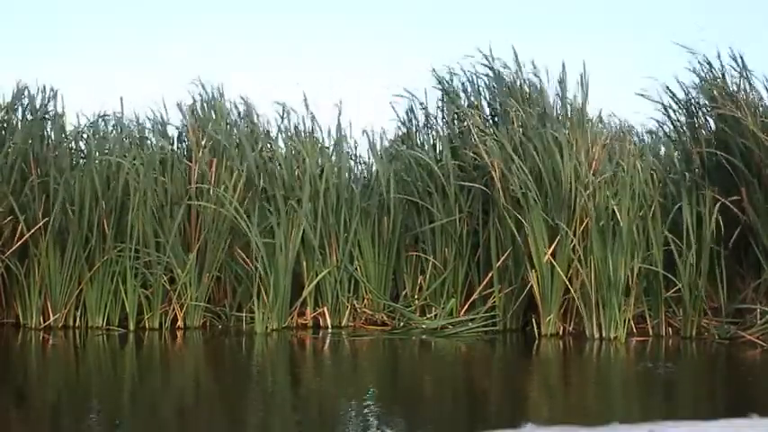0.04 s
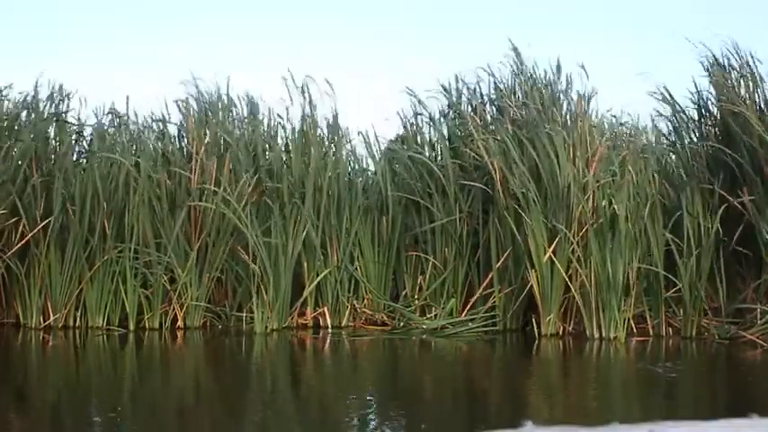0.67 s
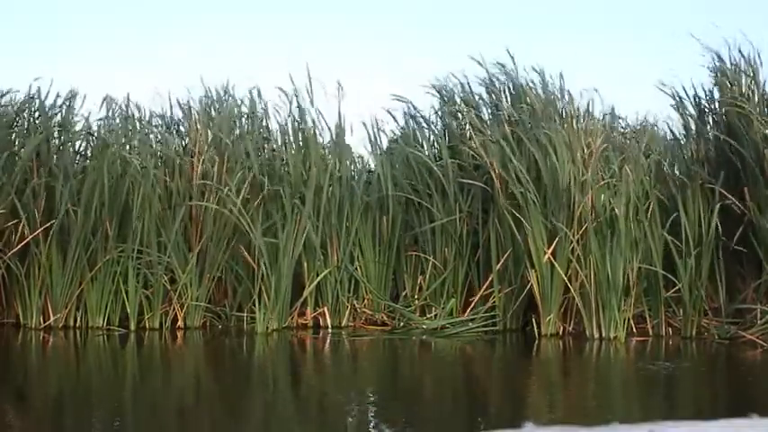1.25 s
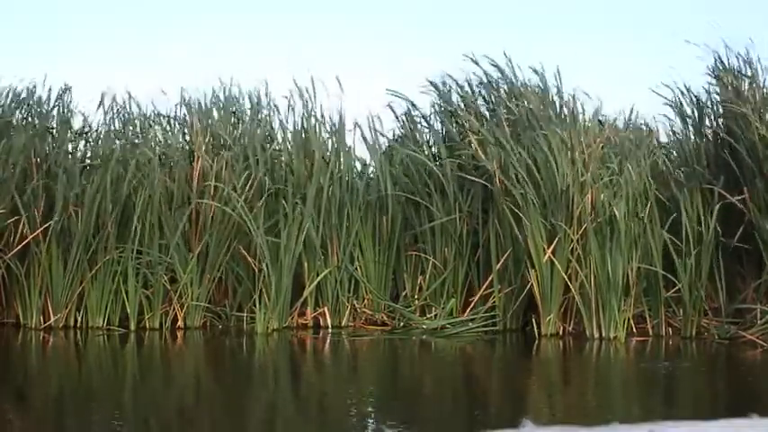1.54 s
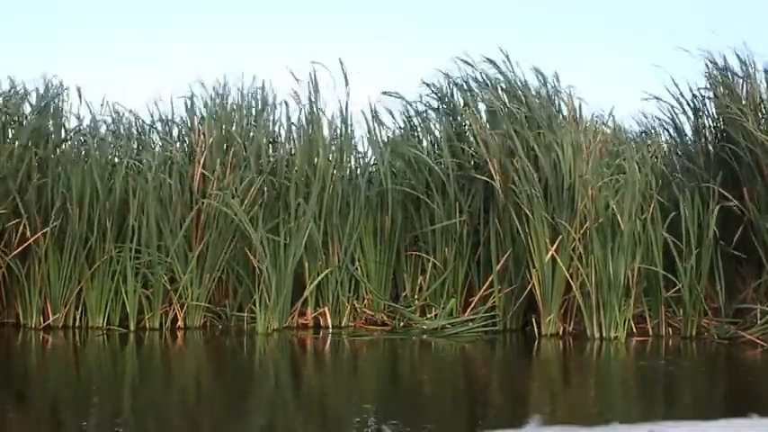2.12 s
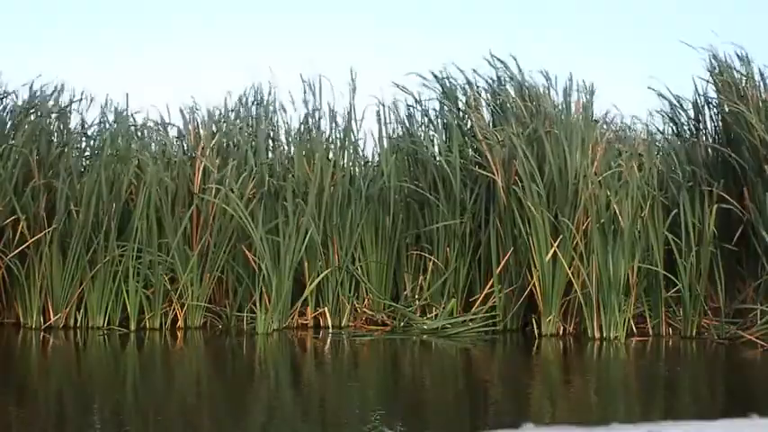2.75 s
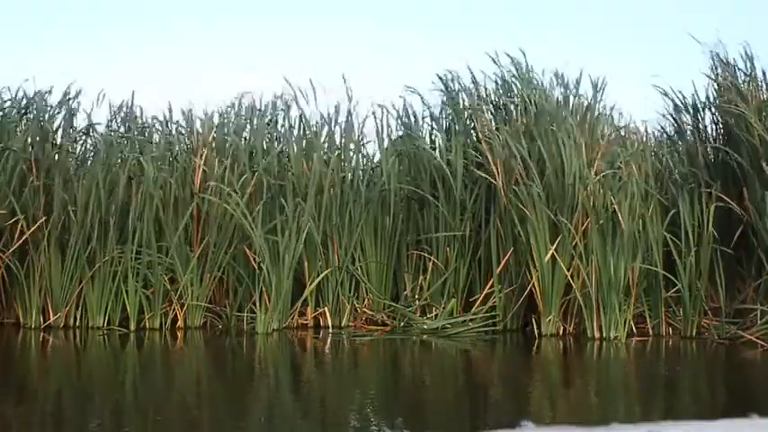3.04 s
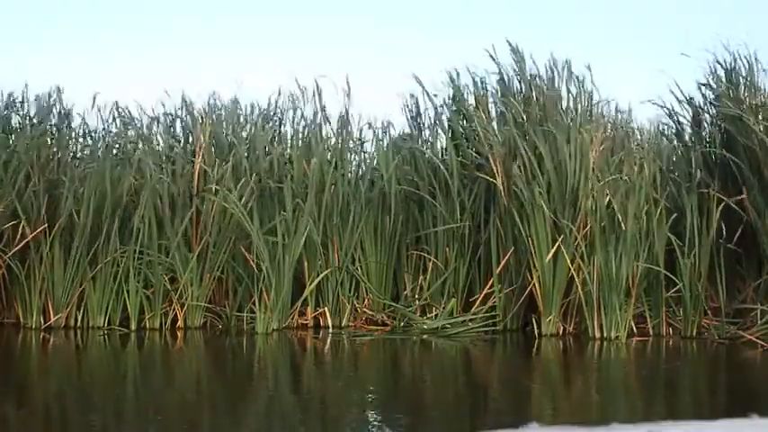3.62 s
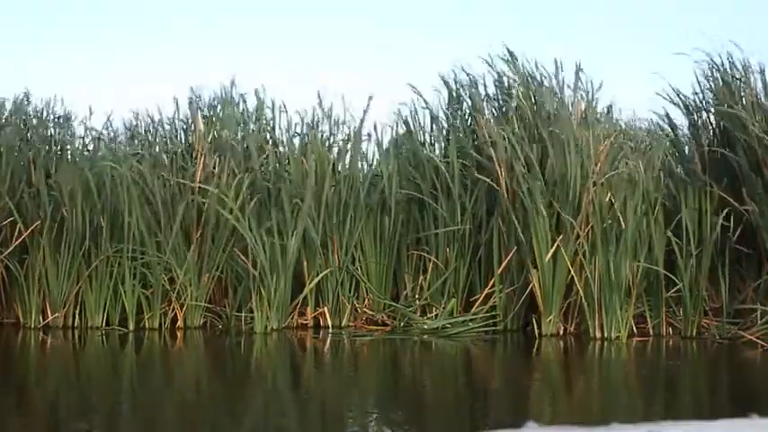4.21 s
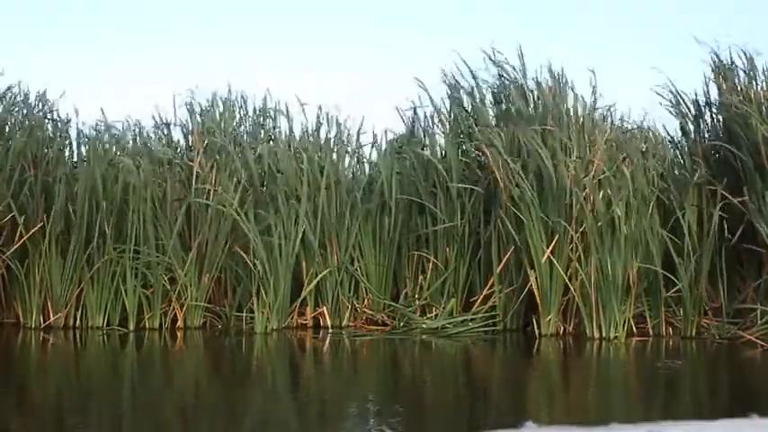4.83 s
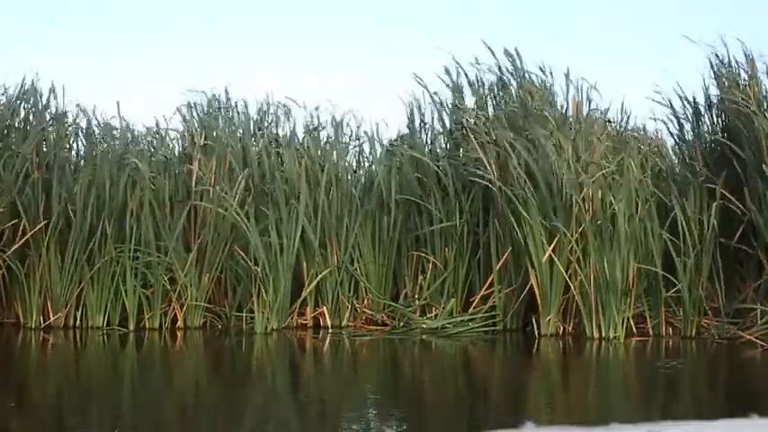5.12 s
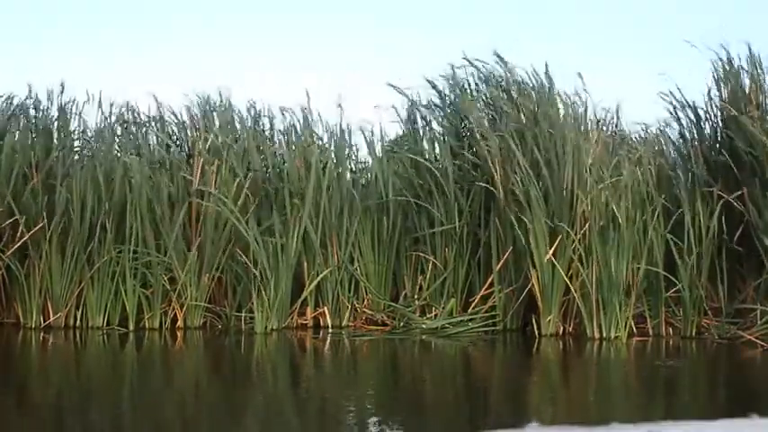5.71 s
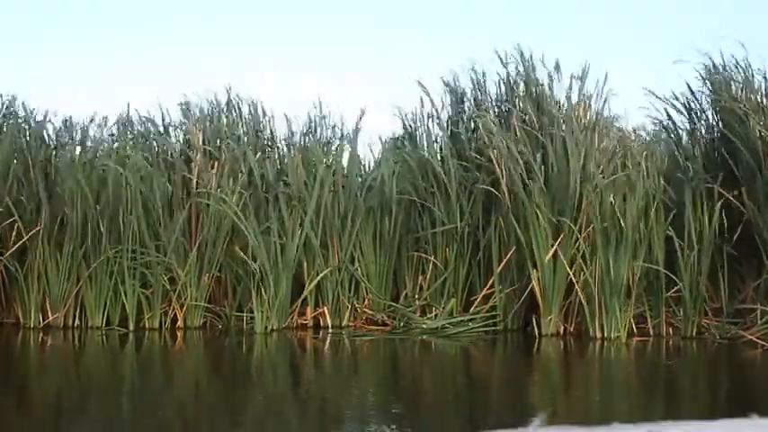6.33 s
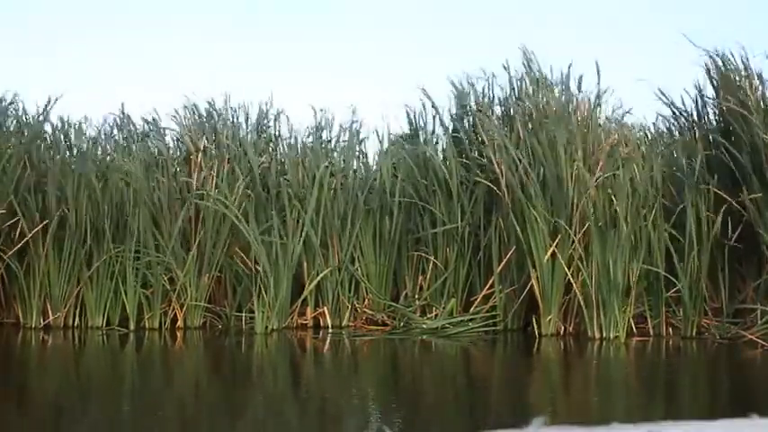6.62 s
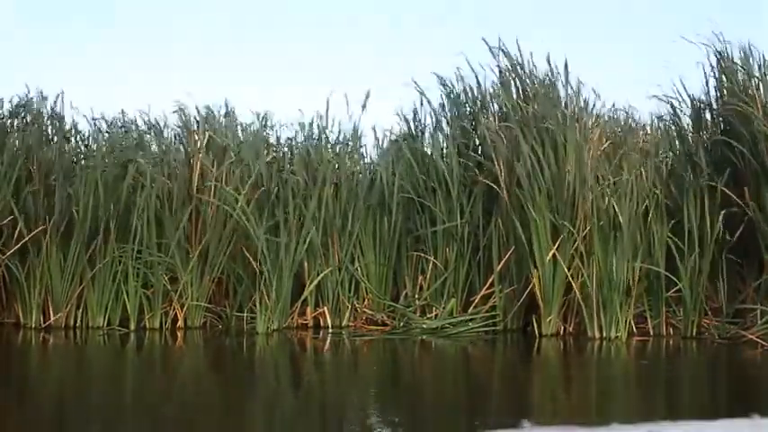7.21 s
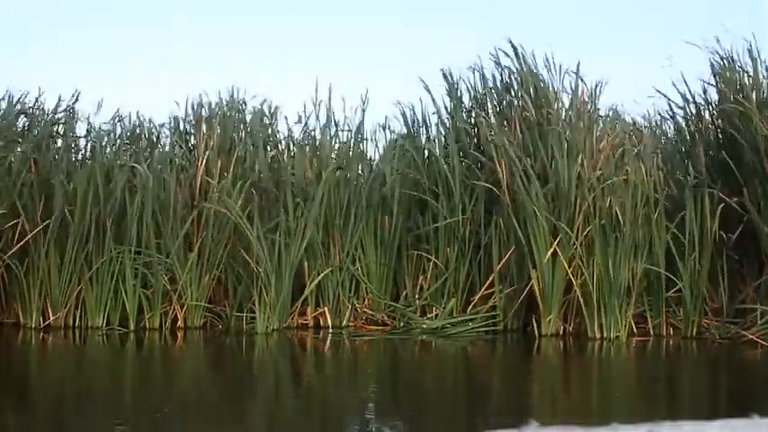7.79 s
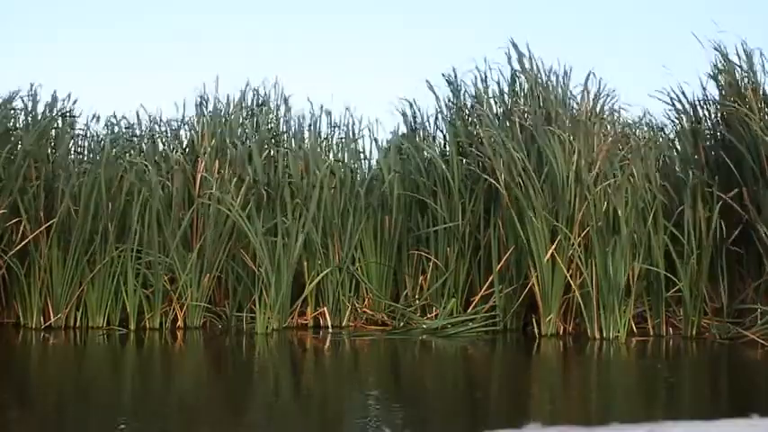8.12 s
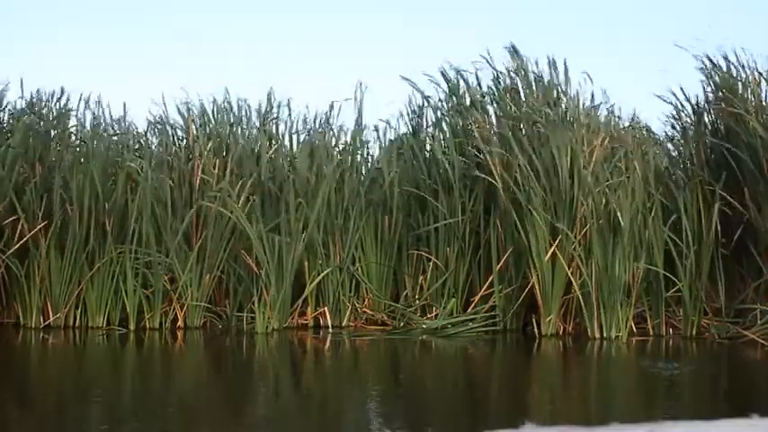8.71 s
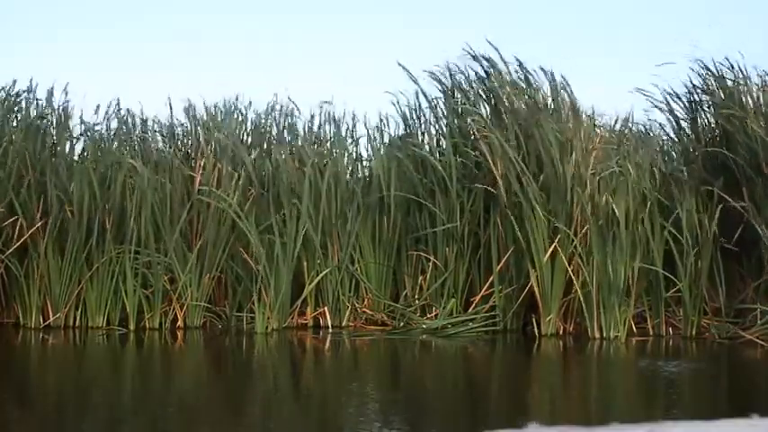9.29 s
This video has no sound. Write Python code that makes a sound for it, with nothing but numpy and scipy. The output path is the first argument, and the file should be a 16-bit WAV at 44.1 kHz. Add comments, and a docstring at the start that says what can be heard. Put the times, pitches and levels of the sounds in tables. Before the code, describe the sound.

A bed of reeds rustles in the breeze beside the water, with light wind bumps on the microphone. Faint, scattered chirps from small birds build to a brief trill, then the strongest gust hits the microphone with low rumbling thumps. As it drops away, several clearer chips ring out, and a farther bird whines nasally near the end over the softening hiss.

```python
"""Wind hisses through a tall reed bed at a lake shore: leaves rub and tick, air rushes between the stems.
One gust, strongest halfway, buffets the microphone; its eddies land as soft thuds over a rumble.
Small birds twitter and chip in short bent whistles. Farther off, another bird gives thin nasal whines,
stacks of harmonics shaped by its throat. The stems scatter the calls into an echo.
The mono recorder adds faint metallic tones to the whistles; its limiter ducks under the hardest thud."""
import sys
import numpy as np
from scipy import signal
from scipy.fft import rfft, irfft, next_fast_len
from scipy.io import wavfile
from scipy.ndimage import uniform_filter1d, map_coordinates

SR = 44100
rng = np.random.default_rng(int(sys.argv[2]) if len(sys.argv) > 2 else 0)


def dump(signal):
    """Clip the signal to [-1, 1] and save it as 16-bit WAV at the path in sys.argv[1]."""
    limited = np.clip(np.atleast_2d(signal).T, -1, 1)
    pcm = np.round(limited * 32767).astype(np.int16)
    wavfile.write(sys.argv[1], SR, pcm)


N = 412335


def amp(db):
    """Decibels to gain."""
    return 10 ** (np.asarray(db) / 20)


def unit(x):
    """x at rms 1."""
    return x / np.sqrt(np.mean(x ** 2) + 1e-20)


def spectrum_db(points, hz):
    """Rows of f/Hz, level/dB, read on a log frequency axis."""
    knots_hz, db = np.transpose(points)
    return np.interp(np.log(hz + 1), np.log(knots_hz + 1), db)


def envelope_db(points):
    """Rows of t/s, level/dB, read at every sample."""
    return np.interp(np.arange(N) / SR, *np.transpose(points))


def wobble(rate_hz):
    """Smooth random curve through rate_hz knots a second."""
    knots = rng.standard_normal(int(N * rate_hz / SR) + 4)
    return map_coordinates(knots, [np.arange(N) * rate_hz / SR])


def filtered(x, response):
    """Zero-phase filter; response maps Hz to gain."""
    size = next_fast_len(N + SR // 2)
    return irfft(rfft(x, size) * response(np.fft.rfftfreq(size, 1 / SR)), size)[:N]


def rush(spectrum, patchy_db):
    """Coloured noise at rms 1, with patches of random gain in time and frequency."""
    bins = signal.stft(rng.standard_normal(N), nperseg=512)[2]
    patches = uniform_filter1d(rng.standard_normal(bins.shape), size=8, axis=0)
    patches = unit(uniform_filter1d(patches, size=16, axis=1))
    noise = signal.istft(bins * amp(patchy_db * patches), nperseg=512)[1][:N]
    return unit(filtered(noise, lambda hz: amp(spectrum_db(spectrum, hz))))


def fade(t, length_s, edge_s):
    """Quarter-sine fade in and out."""
    return np.sin(np.pi / 2 * np.clip(np.minimum(t, length_s - t) / edge_s, 0, 1))


def add(track, start_s, sound):
    """Mix a short sound into the track."""
    part = track[max(round(start_s * SR), 0):][:len(sound)]
    part += sound[:len(part)]


def leaf_ticks(count=9000, spread_db=4.0, decay_cycles=4):
    """Dry blades tap each other: tiny damped pings of scattered pitch and size."""
    when, pitch, size = rng.random((count, 3)).T[:, :, None]
    hz = 2500 * (13000 / 2500) ** pitch
    gain = amp(-spread_db * np.log(np.maximum(size, np.exp(-5))))
    offsets = np.arange(96)
    cycles = hz * offsets / SR
    pings = gain * np.sin(2 * np.pi * cycles) * np.exp(-cycles / decay_cycles)
    samples = (when * N).astype(int) + offsets
    return unit(np.bincount(samples.ravel(), pings.ravel(), N)[:N])


def reeds():
    """Leaves rub into a hiss that brightens with the wind; the nearest tick; air rushes past stems."""
    # wind in the leaves: t/s, relative level/dB
    breeze = [(0, -44.5), (.7, -44), (1.5, -42), (3.2, -41.5), (3.7, -42), (4.4, -42), (5.2, -44),
              (7, -45.5), (7.5, -46.5), (9.35, -47.5)]
    # spectra of leaf hiss, finest hiss and stem rush: f/Hz, relative level/dB
    leaf_spectrum = [(600, -33), (1500, -4.5), (2800, -2), (4000, -1.5), (5200, -1.5), (7500, -4.5),
                     (9500, -4.5), (11500, -4.5), (13500, -10.5), (16000, -20)]
    fizz_spectrum = [(4000, -24), (8000, -12), (11500, -1.5), (14000, -1), (16000, -5.5)]
    stem_spectrum = [(60, -20), (150, 7.5), (300, 4.5), (600, 1), (1000, -1.5), (1600, -5), (3000, -13.5),
                     (8000, -36)]
    leaf_db = envelope_db(breeze)
    gust_db = leaf_db - leaf_db.mean()
    sway_db = wobble(3.01)
    stir_db = 0.26 * sway_db + 0.5 * wobble(14)
    hiss = amp(leaf_db + 5.5 + stir_db) * rush(leaf_spectrum, patchy_db=0.3)
    fizz = amp(-47 + 1.35 * (gust_db + stir_db) + 0.43 * wobble(40)) * rush(fizz_spectrum, patchy_db=2.5)
    ticks = amp(leaf_db - 9.5 + sway_db + 4.6 * wobble(20)) * leaf_ticks()
    stems = amp(-40 + 0.86 * gust_db + 0.56 * wobble(4.6)) * rush(stem_spectrum, patchy_db=1.4)
    return hiss + fizz + ticks + stems


def among_stems(calls, wet_db, near_t60_s, far_db, far_t60_s=0.99):
    """Stems scatter a call into a dense echo; the shore adds a faint longer one."""
    t = np.arange(SR // 2) / SR
    decay = amp(-60 * t / near_t60_s) + amp(far_db - 60 * t / far_t60_s)
    tail = rng.standard_normal(len(t)) * decay * (t > 0.004)
    return calls + amp(wet_db) * signal.fftconvolve(calls, tail / np.linalg.norm(tail))[:N]


def whining_bird(fading_db=2.5, rough_depth=0.038):
    """Reedy harmonics bend through three pitches; each wavers in level on its way through the stems."""
    # syllables: t/s, length/s, first f/Hz, middle f/Hz, last f/Hz, level/dB,
    # tilt/(dB/octave), even-harmonic gain/dB, roughness/0-1
    syllables = [(-.01, 0.06, 667, 750, 715, -39, -4, 2, 0), (.036, .07, 700, 652, 770, -38.5, -4, 4, 0),
                 (0.105, 0.039, 675, 650, 665, -37, 0, 1, 0.04),
                 (.155, .04, 694, 745, 715, -44.5, -7, 10, .2), (3.99, 0.062, 746, 745, 756, -40, 1, 0, .7),
                 (4.053, 0.08, 765, 762, 768, -36.5, 5.5, 2.5, 0.44),
                 (4.15, .062, 762, 730, 756, -39, 4, -1, .9), (4.219, 0.045, 740, 752, 770, -37, 9, 0, .8),
                 (6.45, .27, 703, 693, 713, -47, 6, -1, 0.85),
                 (8.456, 0.049, 712, 783, 815, -45, -1, -2, .3),
                 (8.491, .082, 753, 767, 865, -40, 0, -1, 0.5),
                 (8.561, .082, 790, 740, 820, -37.5, 2, -2, 0.44),
                 (8.641, 0.047, 708, 730, 820, -35.5, 6, -6, 0.1),
                 (8.68, .048, 796, 847, 816, -36.5, 3.5, 1, 0.3),
                 (9.091, 0.034, 716, 715, 750, -41, -1, 1, .4),
                 (9.118, .105, 746, 729, 697, -37, 0, 4, 0.26),
                 (9.221, 0.096, 700, 691, 668, -36.5, 1, 7, 0.55)]
    # throat response: f/Hz, gain/dB
    throat = [(1330, -8), (1420, -8.5), (1500, -4.5), (1620, -5), (1750, -4), (1960, 6.5), (2170, 5),
              (2400, 2.5), (2600, -9), (2740, 0.5), (2900, -3.5), (3100, -18), (3400, -4), (3600, -8),
              (4000, -6), (4500, -8), (4750, -14), (5030, -6.5), (5220, -15), (5500, -11), (6000, -20),
              (6550, -11), (7200, -24)]
    calls = np.zeros(N)
    orders = np.arange(2, 9)[:, None]
    jitter = wobble(350)
    fades_db = fading_db * np.array([wobble(45) for _ in orders])
    for start_s, length_s, first_hz, middle_hz, last_hz, db, tilt_db, even_db, rough in syllables:
        t = np.arange(N) / SR - start_s
        on = (t >= 0) & (t <= length_s)
        t = t[on]
        hz = np.polyval(np.polyfit([0, 0.5, 1], [first_hz, middle_hz, last_hz], 2), t / length_s)
        phase = 2 * np.pi * np.cumsum(hz * (1 + rough_depth * rough * jitter[on])) / SR
        voice_db = tilt_db * np.log2(orders) + even_db * (orders % 2 == 0)
        gains = amp(voice_db + spectrum_db(throat, orders * hz) + fades_db[:, on])
        tone = unit((gains * np.sin(orders * phase)).sum(axis=0))
        add(calls, start_s, amp(db) * fade(t, length_s, edge_s=0.011) * tone)
    return calls


def twitter_notes(arch=0.0135):
    """Single gliding notes, bent up slightly in the middle."""
    # notes: t/s, length/s, f/Hz, glide/octaves, level/dB, rasp/0-1
    notes = [(0.98, 0.023, 2690, 0, -44, 0.15), (1.223, 0.028, 2640, 0.08, -42, 0.25),
             (1.475, .03, 3050, 0.02, -44, 0), (1.607, .04, 2950, 0, -43, 0.16),
             (1.682, 0.032, 2820, -0.023, -40, 0.04), (1.717, .035, 3050, -0.086, -39.5, 0.4),
             (1.841, 0.042, 3050, .08, -42, .3), (2.048, 0.06, 3290, -0.016, -47, 0.1),
             (2.274, 0.054, 3150, 0.11, -44, 0.1), (3.311, .06, 3080, -0.023, -42.5, 0.27),
             (3.455, 0.055, 2940, 0.015, -41, 0.25), (3.594, 0.082, 2456, -0.44, -41, 0.8),
             (3.786, 0.04, 2670, -0.17, -34, 0.12), (3.918, 0.072, 2620, -0.092, -33.5, 0.6),
             (4.242, .025, 2690, -0.065, -35.5, .2), (4.26, 0.027, 2160, 0.045, -33, 0.24),
             (4.292, 0.1, 1850, 0.04, -35.5, 0.41), (4.386, 0.063, 1745, -0.065, -37.5, 0),
             (4.522, 0.053, 2560, 0.029, -41, 0.24), (4.755, 0.025, 3380, 0.073, -30, .35),
             (4.982, 0.037, 2190, 0.015, -37.5, 0), (5.109, 0.025, 2590, 0.017, -37, 0.16),
             (5.941, 0.0425, 2600, 0.16, -27.5, 1), (6.374, 0.035, 2760, -0.015, -28.5, 0.6),
             (6.418, 0.4, 2542, -0.084, -44, 0.31), (7.255, 0.041, 2500, 0, -40, 0.34),
             (7.352, 0.02, 2315, -0.4, -30, 0.57), (7.372, 0.049, 2301, 0.032, -24, 0.16),
             (7.44, 0.009, 3320, -.3, -22.5, 0.24), (7.446, 0.015, 2930, -0.086, -16.5, 0.4),
             (8.748, 0.023, 2380, 0.028, -41, 0.5), (8.861, 0.021, 2480, -0.15, -36.5, 0.57),
             (8.969, 0.029, 2370, 0.15, -38.5, 0.7)]
    return [(start_s, db, length_s, hz * 2 ** (-glide / 2), hz * (1 + arch), hz * 2 ** (glide / 2), rasp)
            for start_s, length_s, hz, glide, db, rasp in notes]


def trill_notes(foot_s=0.016, foot_db=-33.5, foot_rasp=0.24, top_s=0.042, top_rasp=0.25, bend=0.025):
    """Upward hooks: each touches the same soft foot, then leaps to a raspy arch."""
    # hook tops: t/s, f/Hz, level/dB
    hooks = [(4.556, 3590, -30), (4.636, 3590, -29.5), (4.721, 3770, -29.5), (4.808, 3650, -31),
             (4.885, 3580, -33)]
    foot_hz = (3100, 2900, 3190)
    feet = [(start_s, foot_db, foot_s, *foot_hz, foot_rasp) for start_s, _, _ in hooks]
    tops = [(start_s + foot_s, db, top_s, hz * (1 - bend), hz, hz * (1 - bend / 2), top_rasp)
            for start_s, hz, db in hooks]
    return feet + tops


def chip_notes():
    """Two-part chips: a raspy arch leaps straight to a clear whistle."""
    # chips: t/s, arch level/dB, whistle level/dB
    chips = [(6.701, -24, -24), (6.96, -25, -23)]
    # the two parts: length/s, first f/Hz, middle f/Hz, last f/Hz, rasp/0-1
    arch = (0.042, 3080, 3680, 3350, 0.29)
    whistle = (0.046, 4740, 4900, 4850, 0.079)
    notes = []
    for start_s, arch_db, whistle_db in chips:
        notes += [(start_s, arch_db, *arch), (start_s + arch[0], whistle_db, *whistle)]
    return notes


def recorder_distortion(whistle, t, level_db=-22, offset_hz=3900):
    """The recorder's distortion adds faint metallic side tones 3.9 kHz either side of each whistle."""
    return 2 * amp(level_db) * whistle * np.cos(2 * np.pi * offset_hz * t)


def songbirds(rasp_depth=0.16, third_db=-23):
    """Whistles bend through three pitches; fast pitch jitter adds rasp."""
    song, jitter = np.zeros(N), wobble(900)
    for start_s, db, length_s, *bend_hz, rasp in twitter_notes() + trill_notes() + chip_notes():
        t = np.arange(int(length_s * SR)) / SR
        hz = np.interp(t, [0, 0.397 * length_s, length_s], bend_hz)
        hz *= 1 + rasp_depth * rasp * jitter[round(start_s * SR):][:len(t)]
        phase = 2 * np.pi * np.cumsum(hz) / SR
        whistle = np.sin(phase)
        tone = whistle + amp(third_db) * np.sin(3 * phase) + recorder_distortion(whistle, t)
        add(song, start_s, amp(db + 0.05) * fade(t, length_s, edge_s=0.0046) * tone)
    return song


def eddy_arrivals(rumble_db, places, crowding):
    """Sample indices crowded into strong flow: one per equal share of it, at a place 0-1 within."""
    flow = np.cumsum(amp(crowding * rumble_db))
    return np.searchsorted(flow, flow[-1] * (np.arange(len(places)) + places) / len(places))


def small_eddies(rumble_db, count=34, scatter_db=3, typical_hz=118, scatter_octaves=0.42):
    """Lesser eddies, one cycle wide, arrive by chance, more often and harder in strong flow."""
    at = eddy_arrivals(rumble_db, rng.random(count), crowding=0.67)
    size, pitch = rng.standard_normal((count, 2)).T
    db = rumble_db[at] + 6 + scatter_db * size
    hz = typical_hz * 2 ** (scatter_octaves * pitch)
    return list(zip(at / SR, db, hz, np.ones(count)))


def flutter(rumble_db, count=150, centre_hz=210, width_cycles=0.55, loss_db_per_octave=8):
    """Small quick eddies crowd into the strongest flow, each a brief swing of its own pitch and size."""
    places, sizes, pitches, turns = rng.random((count, 4)).T
    arrivals = eddy_arrivals(rumble_db, places, crowding=1.3)
    t = np.arange(-SR // 40, SR // 40) / SR
    track = np.zeros(N)
    for at, size, octaves, turn in zip(arrivals, sizes, 2.6 * (pitches - 0.5), turns):
        hz = centre_hz * 2 ** octaves
        db = rumble_db[at] + 8 * (size - 0.5) - loss_db_per_octave * octaves
        swell = np.exp(-0.5 * (t * hz / width_cycles) ** 2)
        add(track, at / SR + t[0], amp(db) * swell * np.sin(2 * np.pi * (hz * t + turn)))
    return track


def buffeting(wake_s=0.04):
    """Turbulence rumbles on the microphone; eddies are pressure swings with ragged crests and wakes."""
    # wind on the microphone: t/s, relative level/dB
    gust = [(0, -48), (.31, -45), (1.05, -54), (2.05, -47), (2.47, -36), (3.1, -44.5), (3.49, -37),
            (4.2, -44), (4.85, -36.5), (5.1, -31.5), (5.55, -27), (5.95, -32), (6.25, -35.5), (6.48, -34.5),
            (6.7, -43), (7.55, -41.5), (8.18, -37), (8.65, -48.5), (9.35, -37)]
    # strongest eddies: t/s, relative level/dB, f/Hz, Gaussian width/cycles
    strong_eddies = [(.124, -16.5, 260, 0.51), (.228, -21.5, 194, 0.48), (.268, -21, 137, 0.51),
                     (.37, -29, 327, 1.4), (.429, -12.5, 161, 0.64), (.465, -21, 170, 0.54),
                     (.652, -17.5, 146, 0.74), (1.334, -17.5, 133, 0.46), (2.37, -13, 105, 0.81),
                     (2.491, -23, 150, 0.77), (2.618, -27, 135, 0.64), (2.654, -18.5, 98, 0.84),
                     (3.43, -17, 231, 1.24), (3.454, -19, 113, 0.99), (3.494, -29, 140, 0.5),
                     (3.826, -19, 117, .6), (3.875, -14.5, 166, 0.85), (4.068, -23, 130, 0.58),
                     (4.393, -21, 159, 0.52), (4.423, -22, 162, 0.63), (4.819, -20, 128, 0.59),
                     (4.899, -23, 130, 0.48), (4.996, -11.5, 109, 0.74), (5.088, -11.5, 128, 0.76),
                     (5.125, -4.5, 138, 0.61), (5.131, -16.5, 420, 0.66), (5.179, -5, 160, 0.56),
                     (5.203, -20, 170, .7), (5.223, -13, 122, 0.85), (5.396, -12, 128, 0.9),
                     (5.449, -8.5, 302, 0.83), (5.457, 4, 152, 1.04), (5.478, -10, 340, 0.65),
                     (5.533, -6, 150, 1.3), (5.559, -8, 187, 1.4), (5.581, -1, 291, 0.77),
                     (5.63, -20.5, 260, .8), (5.662, -15, 300, 0.7), (5.72, -8.5, 141, 1.3),
                     (5.768, -13, 203, 1.4), (5.852, -8.5, 165, 0.64), (5.912, -14.5, 131, 0.54),
                     (5.958, -16.5, 260, 0.86), (6.015, -12, 130, 0.7), (6.085, -19.5, 500, 0.83),
                     (6.108, -6, 118, 0.48), (6.151, -15, 198, .9), (6.433, -18.5, 335, 0.9),
                     (6.461, -18, 147, 0.79), (6.49, -17, 234, 0.59), (6.51, -15, 161, 0.67),
                     (6.558, -10.5, 192, 0.64), (6.739, -19, 173, 0.4), (7.09, -21, 127, 0.89),
                     (7.378, -18, 118, .7), (7.408, -22.5, 235, 0.96), (7.426, -20.5, 147, 0.66),
                     (7.587, -19, 130, 0.84), (7.779, -19.5, 160, 0.69), (8.105, -18.5, 187, 1.1),
                     (8.152, -19, 145, 0.8), (8.175, -22, 165, 0.82), (8.22, -22.5, 170, 0.53),
                     (9.058, -15.5, 130, 0.47)]
    # spectra of rumble and eddy crests: f/Hz, relative level/dB
    rumble_spectrum = [(12, -19), (28, -3.5), (50, 2), (90, 2.5), (180, -4), (300, -11), (500, -24.5),
                       (900, -50), (2000, -68), (6000, -90)]
    crest_spectrum = [(40, 1), (90, -3.5), (200, 2.5), (400, 0), (850, -13.5), (1300, -30.5), (2000, -60),
                      (4000, -70)]
    rumble_db = envelope_db(gust)
    lumps = wobble(24)
    churn_gain = amp(rumble_db + 4) * unit(amp(3.1 * lumps))
    # strong flow sputters
    crest_gain = amp(-35.5 + 1.36 * (rumble_db - rumble_db.max()) + 0.4 * lumps + 4.3 * wobble(70))
    swings, wake_gain = np.zeros(N), np.zeros(N)
    t = np.arange(-SR // 20, SR // 6) / SR
    eddies = strong_eddies + small_eddies(rumble_db)
    for (peak_s, db, hz, width_cycles), phase in zip(eddies, rng.uniform(0, 2 * np.pi, len(eddies))):
        start_s = peak_s + t[0]
        swell = np.exp(-0.5 * (t * hz / width_cycles) ** 2)
        tearing = (hz / 170) ** 2.1  # fast eddies tear more
        add(swings, start_s, amp(db - 4) * swell * np.sin(2 * np.pi * hz * t + phase))
        add(crest_gain, start_s, amp(db - 14.5) * tearing * swell ** 1.55)
        add(wake_gain, start_s, amp(db - 15) * np.where(t < 0, swell, np.exp(-t / wake_s)))
    rumble = np.hypot(churn_gain, wake_gain) * rush(rumble_spectrum, patchy_db=2.5)
    return rumble + swings + flutter(rumble_db) + crest_gain * rush(crest_spectrum, patchy_db=0.5)


def scene():
    """Reeds, birds and gust, alike in both channels."""
    song = among_stems(songbirds(), wet_db=-1, near_t60_s=0.16, far_db=-22)
    whines = among_stems(whining_bird(), wet_db=-7.5, near_t60_s=0.89, far_db=-19)
    mono = reeds() + song + whines + buffeting()
    return np.array([mono, mono])


def limiter(x, threshold_db=-11, release_db_per_s=9, max_cut_db=4.5, ceiling=0.57):
    """Gain drops under a loud swell and recovers steadily; peaks over the ceiling clip."""
    level_db = 10 * np.log10(np.abs(uniform_filter1d(x[0] ** 2, size=600)) + 1e-12)
    excess_db = np.clip(level_db - threshold_db, 0, max_cut_db)
    recovery_db = release_db_per_s * np.arange(N) / SR
    cut_db = np.maximum.accumulate(excess_db + recovery_db) - recovery_db
    return np.clip(x * amp(-cut_db), -ceiling, ceiling)


def record(dry):
    """Limiter, then the microphone's low cut and a hard band limit."""
    low_cut_hz, top_hz = 22, 15780

    def passband(hz):
        return (hz < top_hz) * hz ** 2 / np.hypot(hz ** 2, low_cut_hz ** 2)

    return np.array([filtered(channel, passband) for channel in limiter(dry)])


dry = scene()
out = record(dry)
dump(out)
```